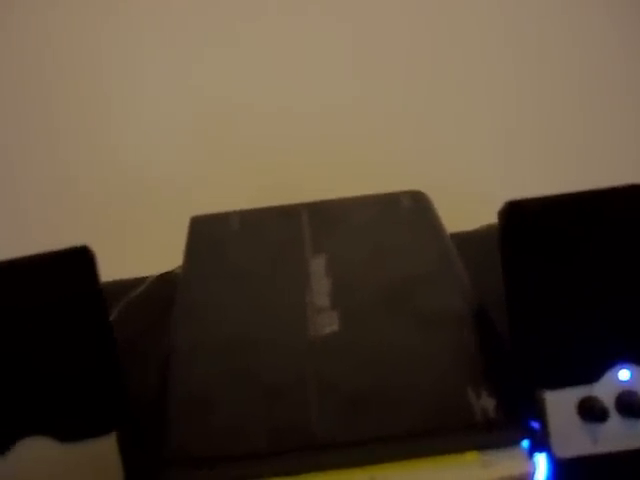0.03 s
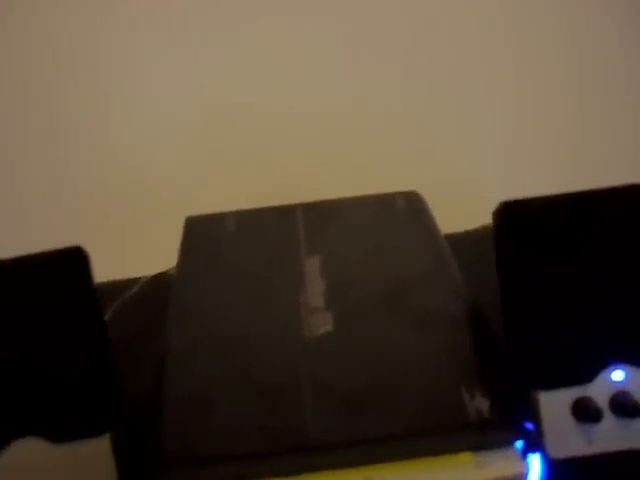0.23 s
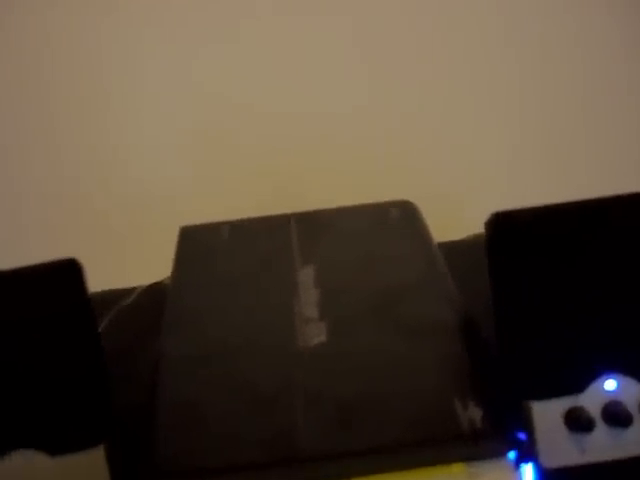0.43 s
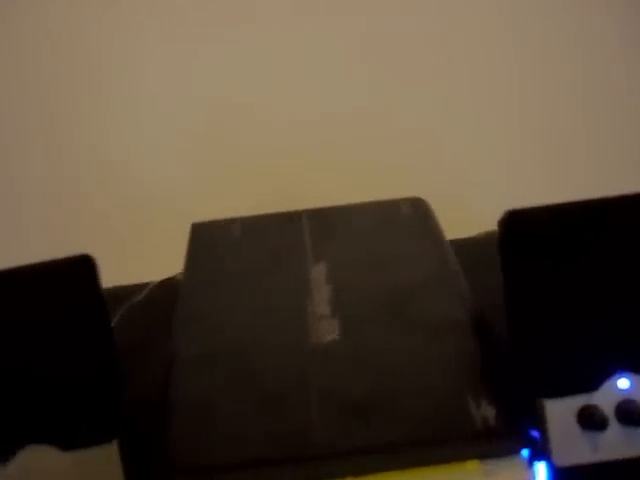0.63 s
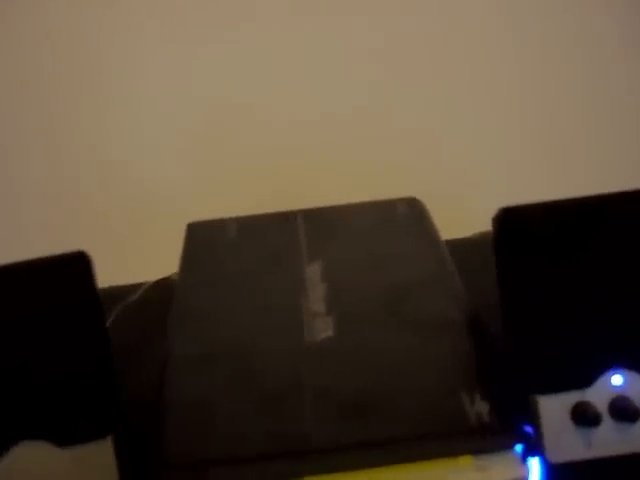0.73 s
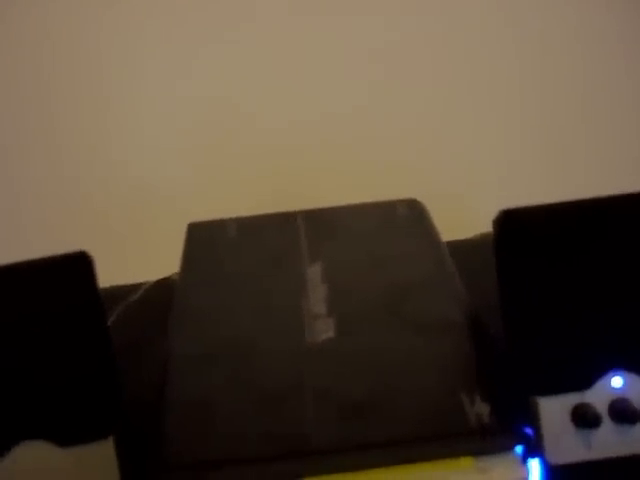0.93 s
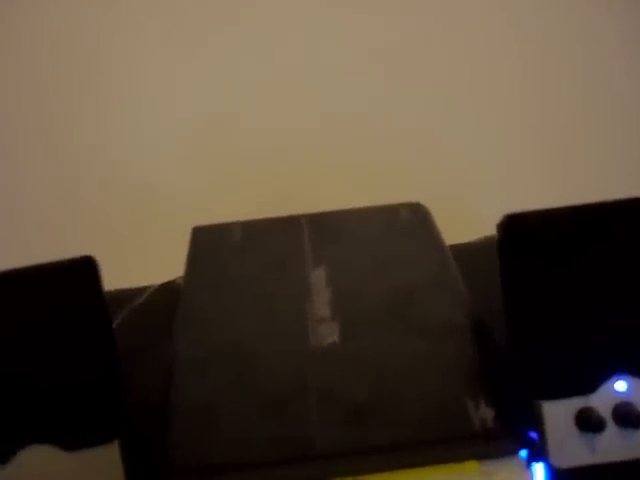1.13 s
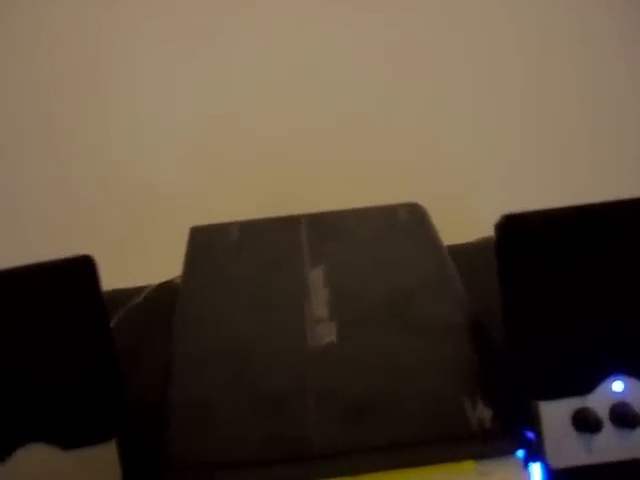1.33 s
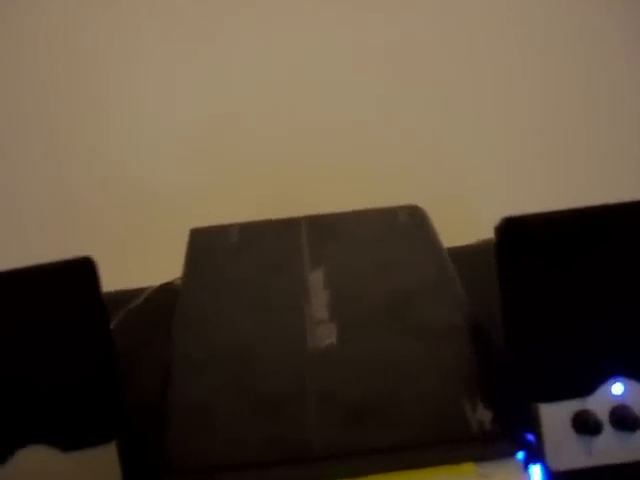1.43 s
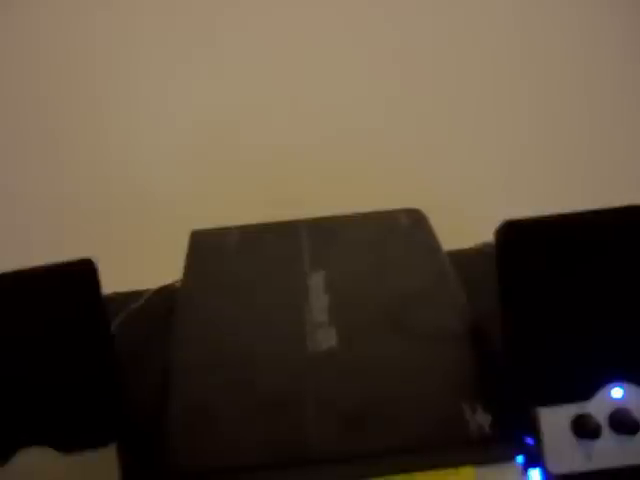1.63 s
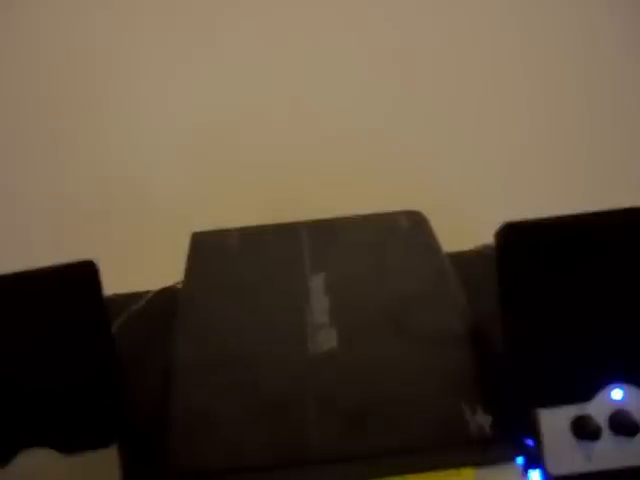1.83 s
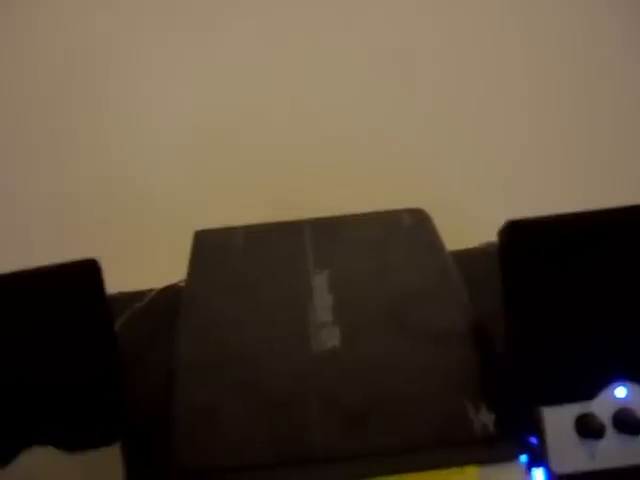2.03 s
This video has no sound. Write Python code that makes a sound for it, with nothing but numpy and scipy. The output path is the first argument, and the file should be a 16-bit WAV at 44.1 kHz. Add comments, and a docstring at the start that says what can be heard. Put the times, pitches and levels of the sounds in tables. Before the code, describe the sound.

A plastic drive casing clunks shut close to the microphone. A light scrape and ticks come first, then a panel bumps and slides before it latches. Low handling rumble and a faint high whine linger in a small, quiet room.

```python
"""First a light scrape and a few ticks: a small part of a plastic drive enclosure, handled close to the
microphone in a small, quiet room. A panel bumps and slides, then the casing clunks shut and latches.
Each blow cracks and rings the plastic's modes; each slide is a stream of tiny slips.
Handling shakes the microphone, which picks it up through its body as rumble and low jolts.
Behind it all lie a thin electronic whine and low room noise, faintly warbled by audio compression."""
import sys
import numpy as np
from scipy import signal
from scipy.fft import rfft, irfft
from scipy.io import wavfile

SR = 44100
rng = np.random.default_rng(int(sys.argv[2]) if len(sys.argv) > 2 else 0)


def store_pcm(level_fs):
    """Save levels as 16-bit WAV."""
    pcm = np.round(np.clip(level_fs, -1, 1) * 32767).astype(np.int16)
    wavfile.write(sys.argv[1], SR, np.atleast_2d(pcm).T)


N = 92610
T = np.arange(N) / SR

# Levels in the tables are relative. A blow's colour is one gain at each of these pitches: f/Hz
COLOUR_HZ = [450, 900, 1650, 3200, 6500, 8500]
# blows on the plastic: t/s, level/dB, six colour gains/dB
CASE_CLUNKS = [(.4085, -20, -10, 5, 12, 13, 5, -21), (.4406, -3.5, 7, -3.5, 4.5, -21, 10, 4.5),
               (0.4424, -2.5, 4, 8.5, -12.5, 8.5, 9.5, 2.5), (.4500, -6, -21.5, 6, 2, 8, -0.5, 8.5),
               (0.4536, -13, -7, 4.5, -1, 13, 11.5, 10.5), (0.4657, -14, 11, 9, -26, 3, 1, 8),
               (.474, -24.5, -16, 0, 14, 13, 8, 14), (.4885, -20.5, -1, -24, 19.5, 19.5, 8, -10),
               (.4925, -16, 6, -5, 0, 4, 8, -16), (0.4981, -17.5, -7, 0.5, -18, 7, 10, -17),
               (.5185, -16, -24, -36, 0, 2.5, 15, -20)]  # the casing shuts and rattles
PANEL_BUMPS = [(.3245, -17, -1.5, -2, -4, -13, -14, -21), (.3345, -8, 3.5, 0.5, -9, -19, -14, -12),
               (.3375, -17.5, -15, -8, -3, 5.5, -0.5, 2), (.3402, -8, -2, -2, 0.5, 4.5, -1, -6.5),
               (.3425, -10.5, 2.5, -9, 5.5, -17, -13, -12)]
PART_TICKS = [(.0862, -19.5, -19, -19, -4, 0, 4, -9), (.110, -28, -2, 6, -33, 11, -11, 2),
              (.1193, -14, -6, -7, -4.5, -8, 9, 1), (.1228, -15.5, -0.5, -2, 3, -4.5, -5, 2),
              (.127, -22.5, -4.5, -3, -16, 8.5, 8, -5)]
# main modes of each struck piece: f/Hz, level/dB, t60/s
CASE_MODES = [(402, -6.5, 0.11), (451, -0.5, 0.1), (809, -7.5, 0.12), (883.3, -4.5, 0.17),
              (1163, -4, 0.056), (1436, -22, 0.045), (1650, -11, 0.067), (1770, -22, 0.15),
              (1946, -18, 0.19), (3000, -30, .07), (3215, -5.5, 0.032), (6970, -4.5, 0.014)]
PANEL_MODES = [(310, -3.5, 0.033), (453.5, 4, 0.11), (516, -15, 0.35), (1010, 2, 0.047), (1175, 1, 0.023),
               (1550, -21, 0.053), (2360, -3, 0.089), (2536, 4.5, 0.021), (3160, -5, 0.03),
               (5040, 0, 0.018), (7110, 2, 0.013)]
PART_MODES = [(466, 5.5, 0.053), (552, -7, 0.2), (1240, -6.5, 0.045), (1587, 1, 0.069), (1730, 0, 0.051),
              (1990, 0, 0.045), (3160, -3, 0.033), (3460, -1.5, 0.053), (5280, -3.5, 0.021),
              (8800, -4, 0.014)]
RING_DB, RING_RISE_S = -31.5, 0.00037
# dense modes of the plastic shell: f/Hz, level/dB
SHELL_SPECTRUM = [(100, -36.5), (260, -16.5), (450, 13), (680, -25.5), (950, 3.5), (1850, 2.5),
                  (2150, -18.5), (2700, -9), (3300, -6), (4150, -14.5), (4900, -8.5), (5900, -13.5),
                  (7000, -12), (7700, -16.5), (8800, -15.5), (10200, -18.5), (10900, -41), (11900, -25.5),
                  (13500, -54)]
# their decay: f/Hz, t60/s
SHELL_T60 = [(200, 0.16), (1000, 0.11), (3000, 0.075), (10000, 0.047)]
SHELL_DB, CRACK_DB, CRACK_S = -32, -35.5, 0.0032
# the latch tongue catches and springs free: t/s, level/dB
LATCH_SNAPS = [(0.4887, -37), (0.4973, -22.5)]
LATCH_HZ, LATCH_T60, LATCH_RISE_S = 1601, 0.038, 0.002

# friction over time: t/s, level/dB
SLIDE_LEVEL = [(.30, -77), (.33, -55.5), (.355, -55), (.381, -58), (.387, -53), (.402, -49), (.412, -44.5),
               (.435, -47.5), (.48, -43.5), (.505, -40), (.535, -64), (.62, -76)]  # plastic slides on plastic
PRESS_LEVEL = [(.27, -78.5), (.315, -58), (.33, -48), (.36, -48.5), (.39, -48.5), (.41, -60)]  # the pressed panel rubs dully
SCRAPE_LEVEL = [(0, -59), (.083, -63), (.10, -51), (.14, -56.5), (.165, -64), (.20, -64.5), (.25, -72),
                (.32, -62)]  # the small part scrapes lightly
# resonances that each of these excites: f/Hz, level/dB
SLIDE_SPECTRUM = [(100, -26), (400, -11), (530, 10), (680, -3), (1000, 2), (1300, 0), (1750, 3), (2100, -8),
                  (2500, 3), (3600, -4), (4150, -6), (5000, -9.5), (6700, -7.5), (8000, -30),
                  (10000, -16.5), (11000, -25.5), (12000, -27), (13500, -54)]
PRESS_SPECTRUM = [(100, -23), (380, 4.5), (520, 7.5), (700, -18), (1100, 0), (1700, 4), (2050, -13),
                  (2450, -3.5), (3600, -33), (8000, -28), (13500, -61)]
SCRAPE_SPECTRUM = [(100, -1.5), (450, -13.5), (700, -3.5), (1500, -5.5), (1900, 7), (2200, -3.5),
                   (2850, -8), (3300, 2.5), (4200, -14), (4900, -9), (5800, -8), (6600, -3.5), (7700, -19),
                   (9000, -11.5), (10100, -15), (10900, -32), (12000, -24), (13500, -45)]
SLIPS_PER_S, SLIP_SPREAD_DB = 1800, 2.0
# faint scuffs of handling: centre t/s, spread/s, f/Hz, spread/octaves, level/dB
SCUFFS = [(0.12, 0.015, 236, 0.9, -65.5), (0.57, 0.021, 237, 0.6, -56), (0.806, 0.011, 3280, 0.11, -72),
          (0.991, 0.032, 185, 0.54, -72.5), (1.016, .04, 1170, 0.18, -76), (1.34, 0.011, 2900, 0.22, -75.5),
          (1.67, 0.0074, 175, 0.58, -64.5), (1.75, 0.024, 1260, 0.22, -71)]
SCUFF_GRAIN, SCUFF_GRAIN_HZ = 0.3, 91.5

# jolts that rock the microphone: t/s, level/dB, f/Hz, t60/s
MIC_JOLTS = [(0.3457, -26.5, 25.5, 0.32), (0.566, -53, 44, 0.18), (0.784, -44.5, 35.7, 0.04),
             (1.051, -55.5, 29.8, 0.15), (1.286, -54, 35, 0.48)]
# handling rumble at the microphone: t/s, level/dB
RUMBLE_LEVEL = [(0, -87), (.12, -91), (.17, -55), (.23, -67.5), (.29, -60.5), (.335, -36), (.38, -48.5),
                (.47, -58.5), (.58, -58), (.66, -64.5), (.85, -69.5), (1.06, -67.5), (1.24, -83),
                (1.33, -66), (1.56, -63.5), (1.62, -74), (1.675, -66), (1.8, -75.5), (2.14, -70.5)]
# its spectrum: f/Hz, level/dB
RUMBLE_SPECTRUM = [(10, -11.5), (28, 1.5), (55, -5.5), (100, -8.5), (150, -18.5), (260, -21), (450, -32),
                   (1000, -61)]

# decay of the small room (f/Hz, t60/s) and its level against the direct sound
ROOM_T60, ROOM_DB = [(150, 0.22), (1000, 0.063), (4000, 0.14), (12000, 0.2)], -15
# room noise: f/Hz, level/dB
ROOM_TONE_SPECTRUM = [(24, -33), (45, -10), (280, -17), (480, -15), (720, -14), (900, -20.5), (1300, -23.5),
                      (1900, -23), (2300, -25), (3300, -25.5), (4000, -28), (4800, -27), (7000, -29),
                      (7900, -26.5), (8500, -29), (10200, -30.5), (11000, -45.5), (12000, -39.5),
                      (13500, -66)]
ROOM_TONE_DB = -69
CODEC_WARBLE_DB, CODEC_PATCH_S, CODEC_PATCH_BANDS = 4.0, 0.021, 1.7
# tones of the electronic whine: f/Hz, level/dB
WHINE_TONES = [(7643.3, 1.5), (7878, -4.5)]
# its swells and dips: t/s, level/dB
WHINE_LEVEL = [(0, -76), (.17, -84), (.26, -78.5), (.44, -67), (.55, -80), (.73, -82.5), (.79, -73.5),
               (.84, -87), (1.0, -74.5), (1.31, -77.5), (1.39, -74.5), (1.48, -77.5), (1.57, -74.5),
               (1.70, -83.5), (1.97, -77.5), (2.02, -80.5), (2.1, -70.5)]
WHINE_WAVER, WHINE_WAVER_HZ, WHINE_HISS_DB, WHINE_HISS_WIDTH_HZ = 0.33, 14, -8, 190
BAND_LIMIT_HZ = 13800


def knocks(blows, modes):
    """Each blow cracks, then rings the struck piece's main modes and the shell's dense ones."""
    out, t = np.zeros(N), np.arange(SR // 3) / SR
    shell_gain = np.sqrt(np.mean(amp(at_hz(SHELL_SPECTRUM, np.fft.rfftfreq(len(t), 1 / SR))) ** 2))
    shell_ring = amp(SHELL_DB) * ringing_noise(SHELL_T60, len(t))
    rise = 1 - np.exp(-t / RING_RISE_S)
    for start, db, *gains in blows:
        tone = list(zip(COLOUR_HZ, gains))
        ring = sum(amp(mode_db + at_hz(tone, hz)) * damped_sine(hz, t60, t) for hz, mode_db, t60 in modes)
        crack = amp(CRACK_DB) * rng.choice([-1., 1.], len(t)) * np.exp(-t / CRACK_S)
        shell = colour(shell_ring + crack, SHELL_SPECTRUM) / shell_gain
        add(out, start, amp(db) * (amp(RING_DB) * ring * rise + colour(shell, tone)))
    return out


def latch():
    """The springy latch tongue rings at one clear pitch."""
    out, t = np.zeros(N), np.arange(SR // 4) / SR
    ping = (1 - np.exp(-t / LATCH_RISE_S)) * damped_sine(LATCH_HZ, LATCH_T60, t)
    for start, db in LATCH_SNAPS:
        add(out, start, amp(db) * ping)
    return out


def slide(curve, resonances):
    """Tiny slips of uneven size excite the plastic as the parts move."""
    slips = (rng.random(N) < SLIPS_PER_S / SR) * rng.choice([-1., 1.], N)
    sizes = amp(SLIP_SPREAD_DB * np.minimum(rng.exponential(1, N), 4))
    return unit(colour(slips * sizes, resonances)) * envelope(curve)


def scuffs():
    """Brief soft rubs, each a grainy swell of noise in one band."""
    out, octave = np.zeros(N), np.log2(np.fft.rfftfreq(N, 1 / SR) + 1)
    for centre, spread, hz, octaves, db in SCUFFS:
        band = irfft(rfft(rng.standard_normal(N)) * bell(octave - np.log2(hz), octaves), N)
        grain = np.exp(SCUFF_GRAIN * drift(SCUFF_GRAIN_HZ))
        out += amp(db) * unit(band * grain) * bell(T - centre, spread)
    return out


def mic_handling():
    """Low rumble and a few damped swings reach the microphone through its body."""
    out = unit(colour(rng.standard_normal(N), RUMBLE_SPECTRUM)) * envelope(RUMBLE_LEVEL)
    t = np.arange(SR // 2) / SR
    for start, db, hz, t60 in MIC_JOLTS:
        add(out, start, amp(db) * damped_sine(hz, t60, t))
    return out


def room(direct):
    """At close range the direct sound leads; the small room adds a short, soft tail."""
    tail = ringing_noise(ROOM_T60, SR // 2)
    tail *= 1 - np.exp(-np.arange(len(tail)) / SR / 0.012)  # reflections build over 12 ms
    return direct + amp(ROOM_DB) * signal.fftconvolve(direct, tail / np.linalg.norm(tail))[:N]


def room_tone():
    """Low steady room noise, with the faint patchy warble of audio compression laid over it."""
    noise = colour(rng.standard_normal(N), ROOM_TONE_SPECTRUM)
    return amp(ROOM_TONE_DB) * unit(codec_warble(noise))


def whine():
    """Two thin electronic tones swell and dip, with a narrow hiss around the lower one."""
    tones = np.zeros(N)
    for hz, db in WHINE_TONES:
        waver = np.exp(WHINE_WAVER * drift(WHINE_WAVER_HZ))
        tones += amp(db) * unit(np.sin(2 * np.pi * hz * T) * waver)
    hiss = unit(drift(WHINE_HISS_WIDTH_HZ) * np.sin(2 * np.pi * WHINE_TONES[0][0] * T))
    return (tones + amp(WHINE_HISS_DB) * hiss) * envelope(WHINE_LEVEL)


def codec_warble(x):
    """Warble like audio compression's: random gain in patches of time and pitch, narrower in the bass."""
    hz, t, spectra = signal.stft(x, SR, nperseg=1024, noverlap=768)
    bands = np.arange(256)
    patch = np.outer(bell(bands - bands.mean(), CODEC_PATCH_BANDS), bell(t - t.mean(), CODEC_PATCH_S))
    warble = unit(signal.fftconvolve(rng.standard_normal((len(t), len(bands))).T, patch, "same"))
    band_of_bin = (60 * np.log1p(hz / 400)).astype(int)
    spectra *= amp(CODEC_WARBLE_DB * warble[band_of_bin])
    return signal.istft(spectra, SR, nperseg=1024, noverlap=768)[1][:N]


def amp(db):
    """Decibels to gain."""
    return 10 ** (np.asarray(db) / 20)


def unit(x):
    """Scales to an rms of one."""
    return x / np.sqrt(np.mean(x ** 2) + 1e-20)


def bell(offset, spread):
    """Gaussian curve with a peak of one."""
    return np.exp(-.5 * (offset / spread) ** 2)


def at_hz(points, hz):
    """Reads a table on a log-frequency axis."""
    f, value = np.transpose(points)
    return np.interp(np.log(hz + 1), np.log(f + 1), value)


def envelope(points):
    """Gain over time from a curve in dB; silent after its last point."""
    return amp(np.interp(T, *np.transpose(points), right=-np.inf))


def add(mix, start, sound):
    """Mixes a sound in at a start time in seconds."""
    part = mix[round(start * SR):][:len(sound)]
    part += sound[:len(part)]


def colour(x, spectrum):
    """Minimum-phase filter with the given spectrum."""
    size = 8192
    log_gain = np.log(amp(at_hz(spectrum, abs(np.fft.fftfreq(size, 1 / SR)))))
    taps = np.fft.ifft(np.exp(np.conj(signal.hilbert(log_gain)))).real[:size // 2]
    return signal.fftconvolve(x, taps)[:len(x)]


def damped_sine(hz, t60, t):
    """One mode, falling 60 dB in t60 seconds."""
    return amp(-60 * t / t60) * np.sin(2 * np.pi * hz * t)


def ringing_noise(decays, count):
    """Evenly spread random ringing, each band dying at its own speed."""
    t, hz = np.arange(count) / SR, np.fft.rfftfreq(count, 1 / SR)
    spectrum = rfft(rng.choice([-1., 1.], count))
    centres, t60s = np.transpose(decays)
    out = np.zeros(count)
    for share, t60 in zip(np.eye(len(decays)), t60s):
        band_gain = at_hz(list(zip(centres, share)), hz)
        out += irfft(spectrum * band_gain, count) * amp(-60 * t / t60)
    return out


def drift(rate_hz):
    """Random wander with an rms of one, mostly slower than rate_hz."""
    hz = np.fft.rfftfreq(N, 1 / SR)
    return unit(irfft(rfft(rng.standard_normal(N)) / (1 + (hz / rate_hz) ** 2), N))


def scene():
    """One microphone close to the enclosure, with the quiet room behind."""
    blows = knocks(PART_TICKS, PART_MODES) + knocks(PANEL_BUMPS, PANEL_MODES)
    blows += knocks(CASE_CLUNKS, CASE_MODES) + latch()
    friction = slide(PRESS_LEVEL, PRESS_SPECTRUM) + slide(SLIDE_LEVEL, SLIDE_SPECTRUM)
    friction += slide(SCRAPE_LEVEL, SCRAPE_SPECTRUM) + scuffs()
    return (room(blows + friction) + mic_handling() + room_tone() + whine())[None]


def record(dry):
    """The recorder's band limit cuts the top of the treble."""
    lowpass = signal.firwin(255, BAND_LIMIT_HZ, window=("kaiser", 8), fs=SR)
    return signal.oaconvolve(dry, lowpass[None], "same")


dry = scene()
out = record(dry)
store_pcm(out)
```